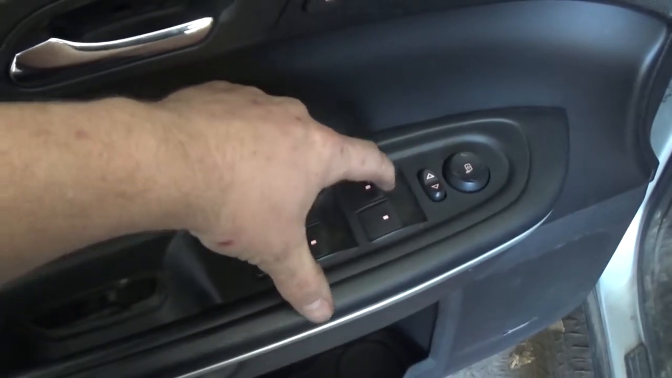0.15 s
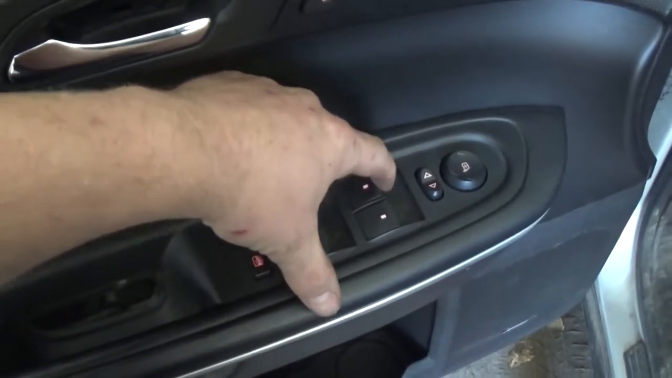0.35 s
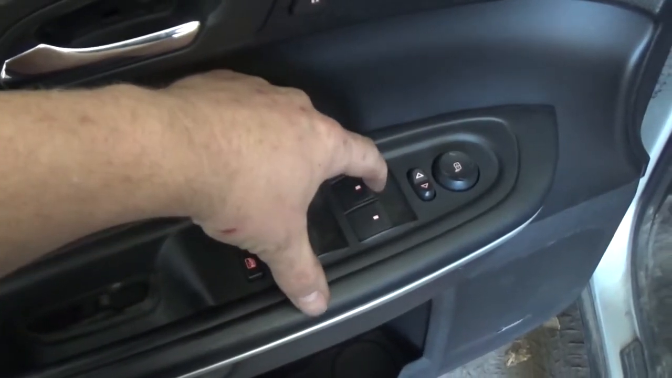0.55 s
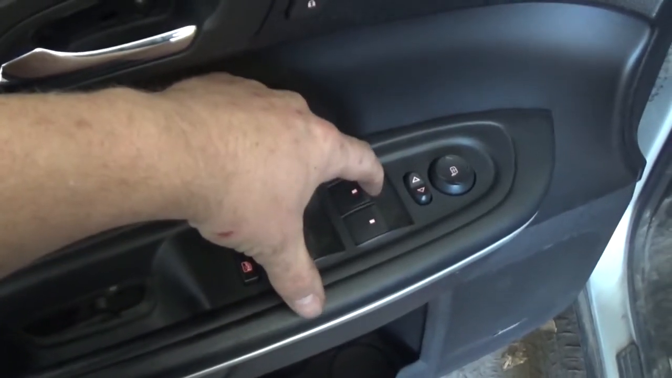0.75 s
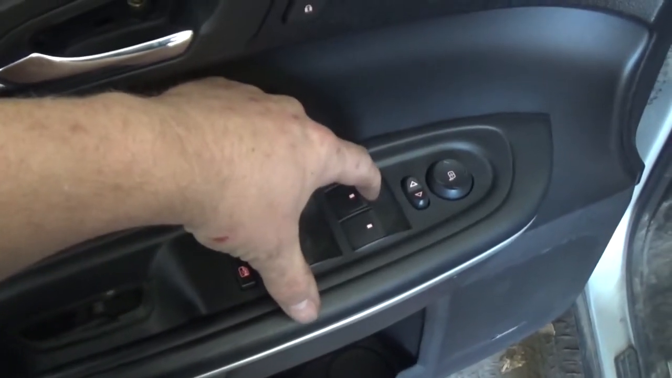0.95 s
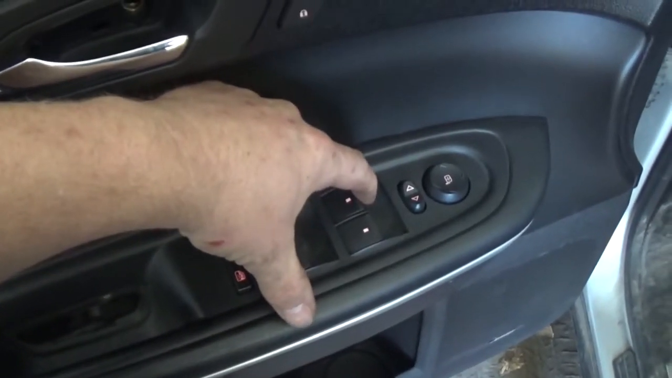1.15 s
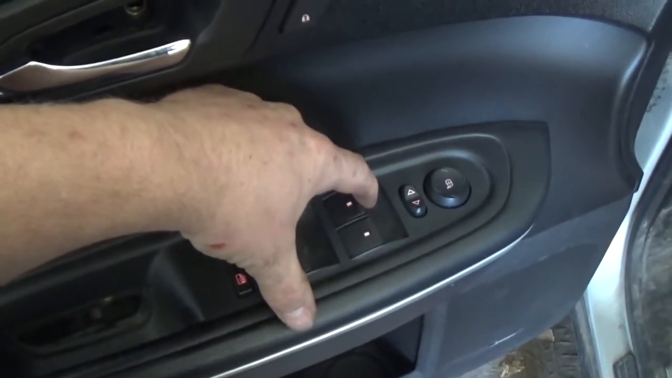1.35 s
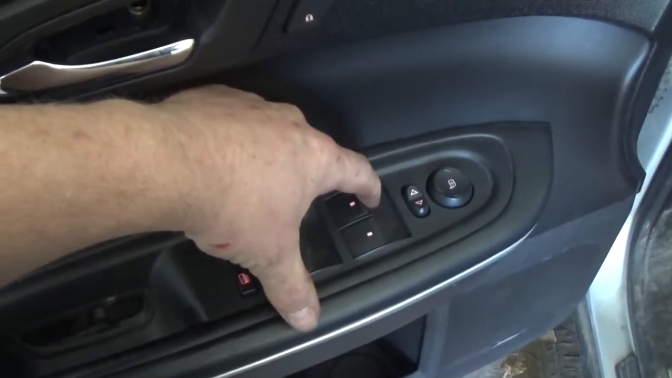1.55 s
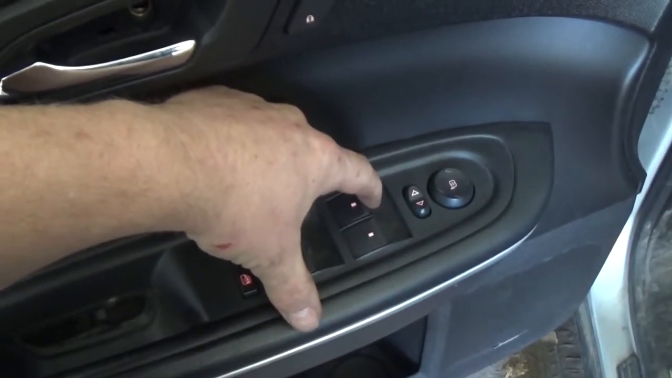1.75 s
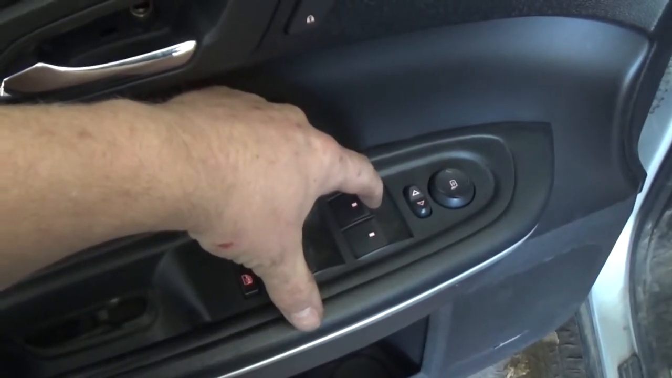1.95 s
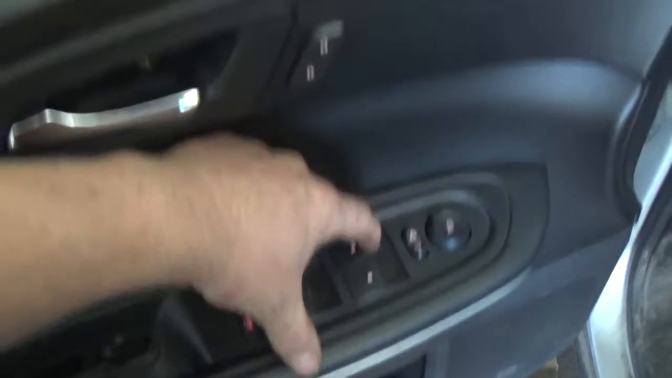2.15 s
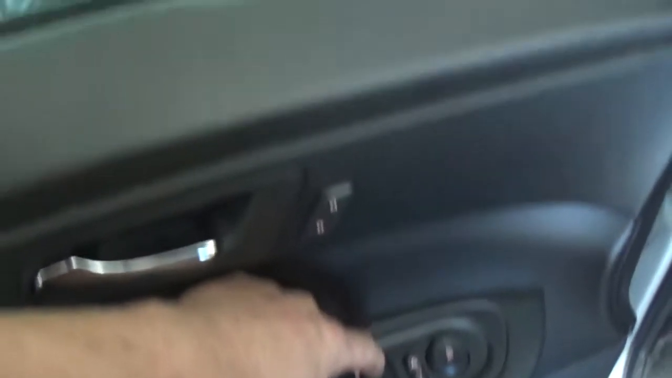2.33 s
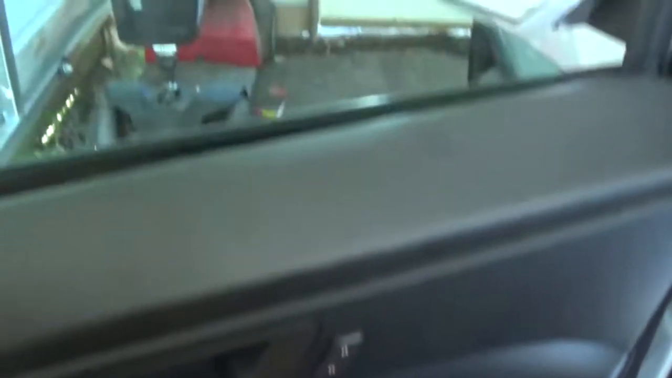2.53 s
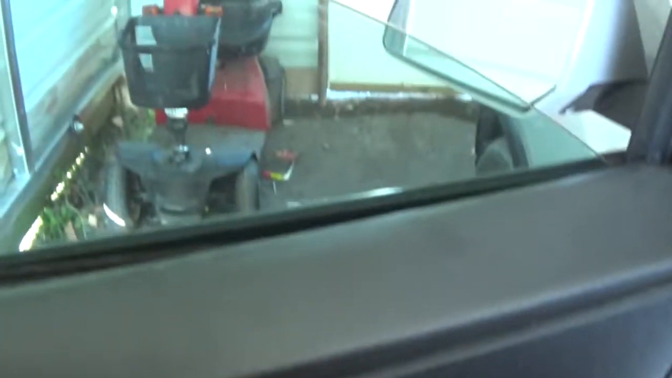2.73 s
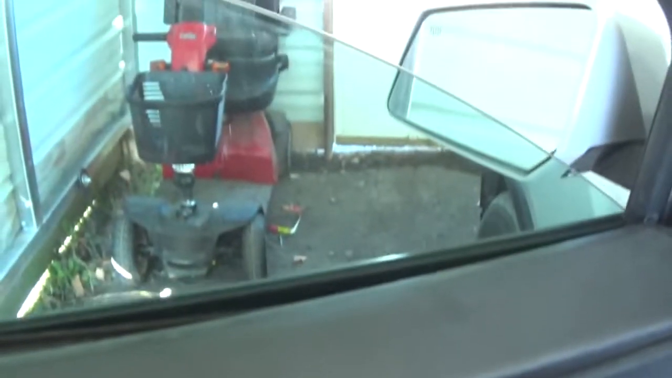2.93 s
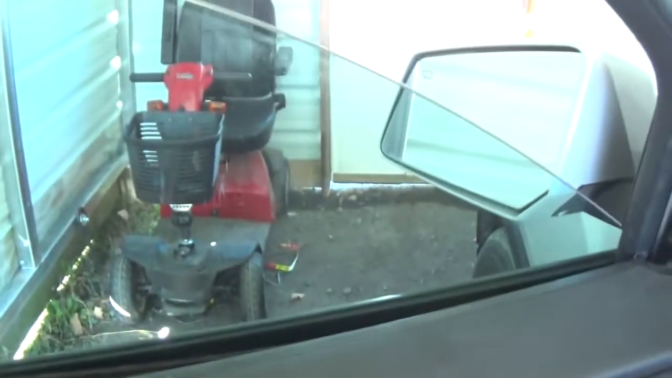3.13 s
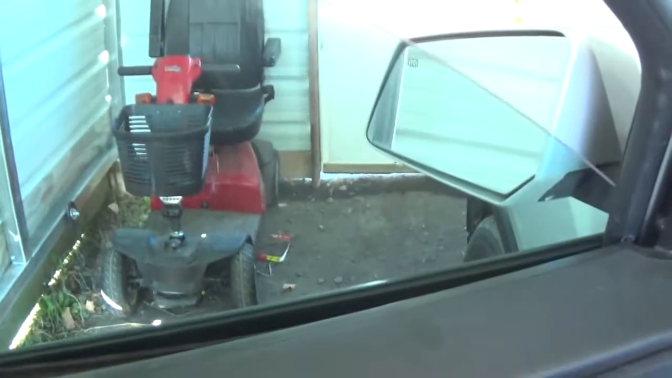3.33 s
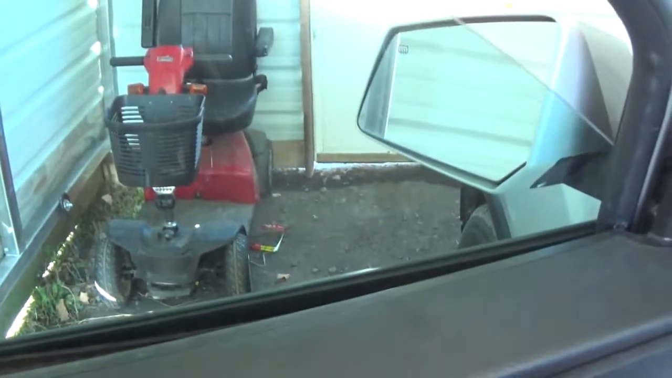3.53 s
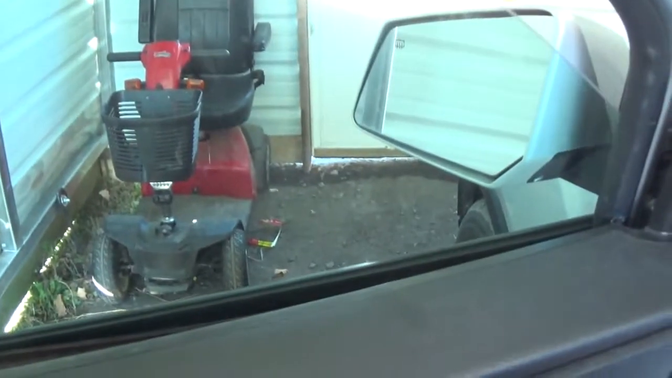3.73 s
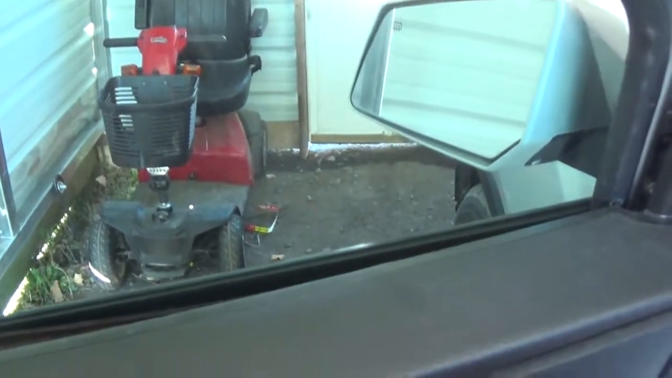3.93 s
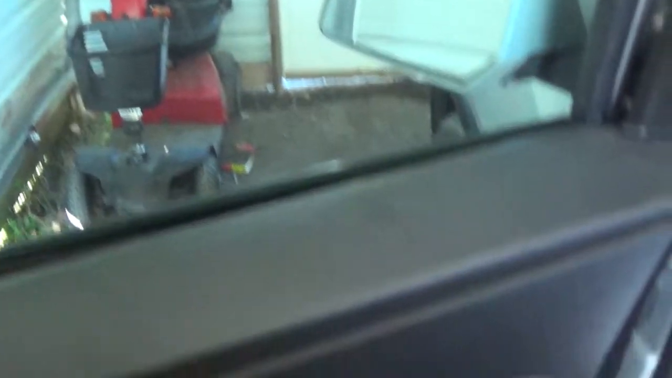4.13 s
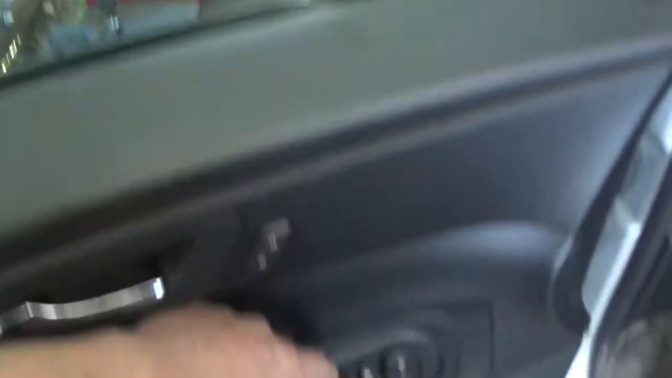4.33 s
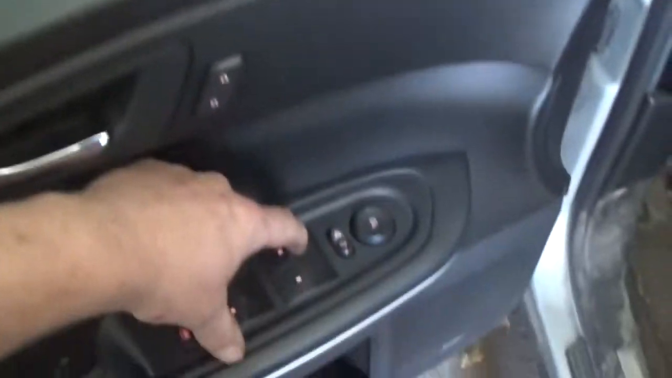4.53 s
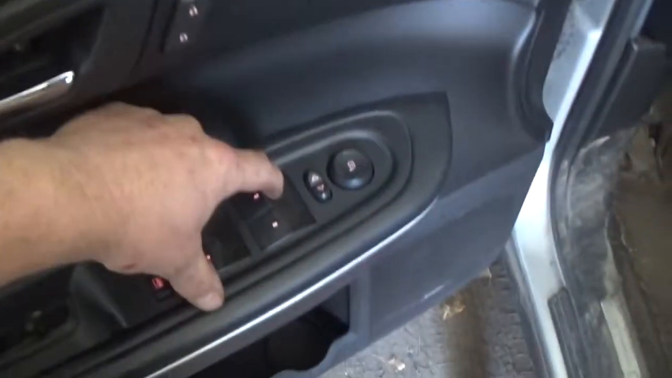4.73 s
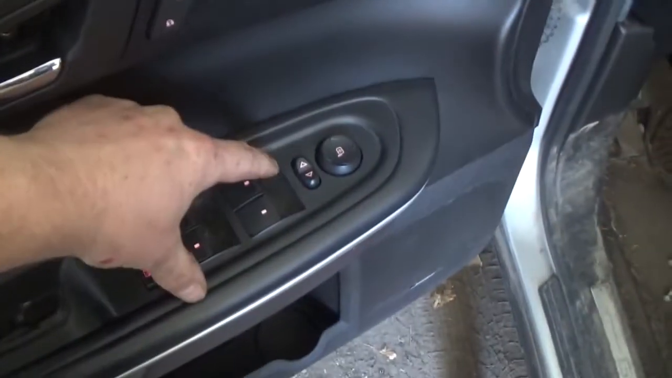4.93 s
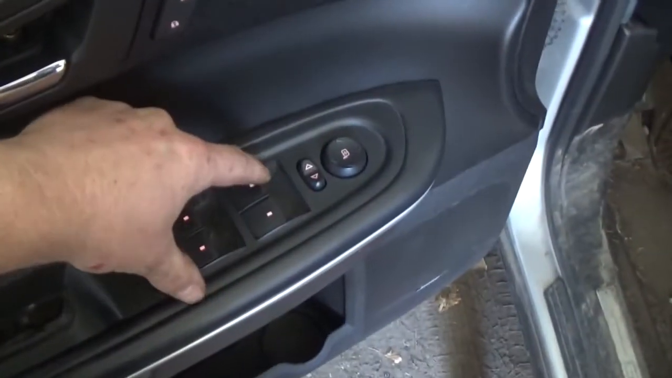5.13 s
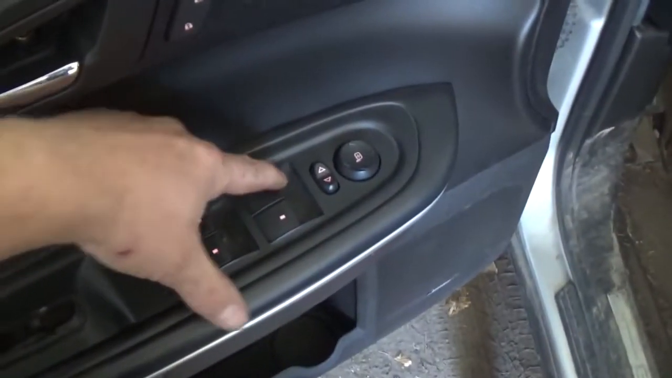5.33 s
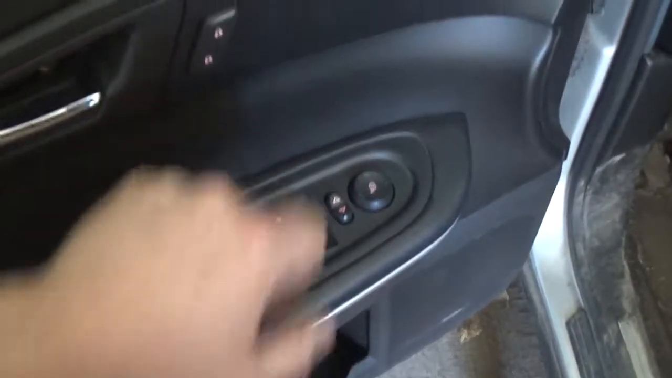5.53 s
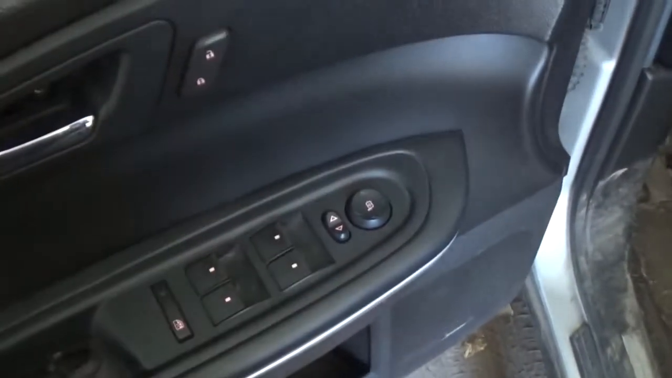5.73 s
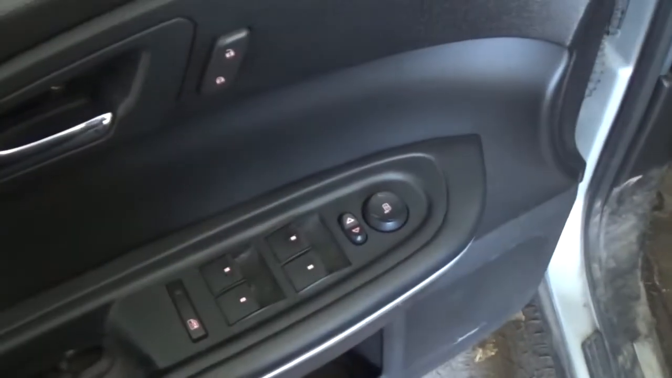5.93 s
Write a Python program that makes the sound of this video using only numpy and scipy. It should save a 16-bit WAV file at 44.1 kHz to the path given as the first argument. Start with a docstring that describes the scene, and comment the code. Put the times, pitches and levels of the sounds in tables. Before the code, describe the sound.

A close stereo microphone pair catches a power window inside a car door. Light ticks and hollow rattling knocks start a buzzing motor whine, with growing brush hiss and glass sliding along seals. Brief rubber squeaks come before the pane hits the top with a soft thump and the motor stops. The switch clicks back, fidgety ticks follow, then a sharp click, knocks and a brighter descending-window whir.

```python
"""A switch clicks over quiet surroundings, knocks sound in a car door and its power window motor whines up.
Shaft-order tones form the whine; filtered noise makes brush hiss, rail rumble, seal rub and felt hiss.
Damped sines and noise bursts make the clicks and knocks as the drive takes up slack and the glass thuds home.
The rubber squeaks, the motor stalls, the switch snaps back and is pressed again.
The lightly loaded motor then spins faster to lower the glass, all heard from close to the door panel."""
import sys
import numpy as np
from scipy import signal
from scipy.fft import rfft, irfft, next_fast_len
from scipy.io import wavfile
from scipy.ndimage import uniform_filter1d

SR = 44100
rng = np.random.default_rng(int(sys.argv[2]) if len(sys.argv) > 2 else 0)


def store_pcm(level_fs):
    """Save levels as 16-bit WAV."""
    pcm = np.round(np.clip(level_fs, -1, 1) * 32767).astype(np.int16)
    wavfile.write(sys.argv[1], SR, np.atleast_2d(pcm).T)


N = 267995
T = np.arange(N) / SR

START_S, SEAL_S, STALL_S = 0.25, 4.47, 4.565  # motor on, glass meets top seal, motor stalls
RISE_S, RELEASE_T60_S = 0.0074, 0.17  # envelope of rubbing sounds


def amp(db):
    """Decibels to gain."""
    return 10 ** (np.asarray(db) / 20)


def unit(x):
    """Scales to an rms of one."""
    return x / np.sqrt(np.mean(x ** 2) + 1e-20)


def struck(x):
    """Scales a blow so that its first 10 ms have an rms of one."""
    return x / np.sqrt(np.mean(x[:SR // 100] ** 2) + 1e-20)


def curves(rows):
    """Interpolates each column of (t/s, ..) rows at every sample."""
    times_s, *columns = np.transpose(rows)
    return [np.interp(T, times_s, column) for column in columns]


def during(rows):
    """One within the time a table spans, zero outside, with soft edges."""
    inside = (T > rows[0][0]) & (T < rows[-1][0])
    return uniform_filter1d(1. * inside, size=400)


def held(start_s, end_s):
    """Quick rise, hold and exponential release."""
    return np.clip((T - start_s) / RISE_S, 0, 1) * dying(np.maximum(T - end_s, 0), RELEASE_T60_S)


def dying(t, t60_s):
    """Exponential decay by 60 dB in t60."""
    return np.exp(-np.log(1000) * t / t60_s)


def colour(x, spectrum):
    """Filters by (f/Hz, gain/dB) rows, interpolated over log frequency."""
    hz, db = np.transpose(spectrum)
    size = next_fast_len(len(x))
    f = np.fft.rfftfreq(size, 1 / SR)
    gain = amp(np.interp(np.log(f + 1), np.log(hz), db))
    return irfft(rfft(x, size) * gain, size)[:len(x)]


def wander(rate_hz):
    """Smooth random curve of rms one with rate_hz knots a second."""
    knots = rng.standard_normal(8192)
    return unit(np.interp(T * rate_hz, np.arange(len(knots)), knots))


def add(mix, start_s, sound):
    """Mixes a sound in at its start time."""
    part = mix[round(start_s * SR):][:len(sound)]
    part += sound[:len(part)]


def ring(modes, t):
    """Damped sines of alternating sign from (f/Hz, level/dB, t60/s) rows."""
    return sum((-1) ** k * amp(db - 60 * t / t60_s) * np.sin(2 * np.pi * hz * t)
               for k, (hz, db, t60_s) in enumerate(modes))


def shaft(turns_per_s, jitter):
    """Shaft angle in radians; uneven friction makes the speed tremble."""
    return 2 * np.pi * np.cumsum(turns_per_s * (1 + jitter * wander(70))) / SR


def tone(angle, order, flutter_db):
    """One multiple of the shaft rate, fluttering in strength."""
    phase = 2 * np.pi * rng.random()
    return np.sqrt(2) * np.cos(order * angle + phase) * amp(flutter_db * wander(45))


# quiet surroundings, noise spectrum: f/Hz, relative density/dB
AMBIENCE_SPECTRUM = [(25, -19), (80, -5), (160, -8.5), (400, 1.5), (520, 0), (680, -3), (840, 2),
                     (1200, -8), (2000, -11), (2400, -13), (3100, -5), (3500, -11), (4200, -3.5),
                     (5000, -16.5), (8700, -11.5), (11000, -17), (15700, -16)]
AMBIENCE_DB = -71.5


def ambience():
    """Steady coloured noise of the surroundings."""
    return amp(AMBIENCE_DB) * unit(colour(rng.standard_normal(N), AMBIENCE_SPECTRUM))


# faint background tones: f/Hz, level/dB
BACKGROUND_TONES = [(1997, -87), (3009, -83), (3112, -90), (3960, -88)]


def still_tones():
    """Thin continuous tones of fixed pitch, fluttering in strength."""
    return sum(amp(db) * tone(2 * np.pi * hz * T, order=1, flutter_db=1.2) for hz, db in BACKGROUND_TONES)


# faint whistles before motor start and after stall: start t/s, end t/s, first f/Hz, last f/Hz, level/dB
WHISTLE_GLIDES = [(0.135, .22, 3400, 3650, -77), (4.6, 4.76, 1900, 1850, -72),
                  (4.59, 4.74, 1230, 1210, -74), (4.59, 4.72, 1020, 1000, -73)]


def whistles():
    """Thin gliding tones, unsteady in pitch and strength."""
    out = np.zeros(N)
    for start_s, end_s, first_hz, last_hz, db in WHISTLE_GLIDES:
        glide = [(start_s, first_hz), (end_s, last_hz)]
        angle = shaft(curves(glide)[0], jitter=0.008)
        out += amp(db) * tone(angle, order=1, flutter_db=2.5) * during(glide)
    return out


# switch clicks and plastic ticks before the final damping:
# t/s, level/dB, main ring f/Hz, t60/s, broad snap level/dB, snap centre f/Hz
SWITCH_CLICKS = [(.106, -59, 6840, 0.016, 9, 7000), (0.164, -45.5, 7500, 0.0026, -8, 3980),
                 (0.207, -39.5, 4240, 0.017, 3, 8000), (4.016, -46, 4700, .009, 24, 6000),
                 (4.049, -42.5, 4450, 0.04, 18, 3470), (4.734, -53.5, 1820, .021, -5, 4000),
                 (4.765, -51, 2670, 0.024, 2, 2780), (4.7885, -54, 3080, 0.012, 13, 3000),
                 (4.793, -30, 4330, 0.016, -4.5, 7800), (5.116, -52, 2620, 0.019, 4, 2200),
                 (5.267, -53.5, 2590, 0.023, 4, 2200), (5.290, -53, 1570, .05, 7, 3000),
                 (5.314, -42, 1540, 0.027, 1, 4500), (5.33, -39.5, 4600, 0.023, 8, 8400),
                 (5.400, -45.5, 4380, 0.0048, 14, 7000), (5.419, -42, 8060, .01, 0, 8000),
                 (5.4341, -32, 3110, 0.045, 7, 6600)]


def clicks():
    """Each click is a broad snap, one short ring of the plastic and a faint answer from the armrest."""
    out, t = np.zeros(N), np.arange(SR // 6) / SR
    armrest_spectrum = [(100, -14), (300, -3), (650, -2.5), (1100, -5.5), (2500, -15), (8000, -48)]
    for start_s, db, ring_hz, t60_s, snap_db, snap_hz in SWITCH_CLICKS:
        burst, body = rng.standard_normal((2, len(t)))
        snap_spectrum = [(snap_hz / 16, -14), (snap_hz / 4, -4), (snap_hz, 0),
                         (snap_hz * 2, -7), (snap_hz * 3, -26)]
        snap_decay = dying(t, t60_s) + 0.1 * dying(t, 0.12)
        snap = struck(colour(burst, snap_spectrum) * snap_decay)
        plastic = struck(ring([(ring_hz, 0, t60_s), (ring_hz * 0.937, -7, t60_s)], t))
        armrest = struck(colour(body, armrest_spectrum) * dying(t, 0.11))
        onset = 1 - np.exp(-t / 0.0004)
        click = struck((plastic + amp(snap_db) * snap + amp(-10) * armrest) * onset)
        add(out, start_s, amp(db) * click)
    # soft plastic damps the top octave
    return colour(out, [(9000, -4.0), (11000, -1.5), (13500, -14), (15700, -30)])


# door modes: f/Hz, level/dB, t60/s
DOOR_MODES = [(218, -2, 0.24), (289, 3, 0.12), (323, 2, 0.17), (527, 12, 0.017), (640, -1, 0.12),
              (696, 2.5, 0.035), (838, 3.5, 0.089), (1000, -26, 0.17), (1300, -43, 0.12), (1470, -19, 0.03),
              (1770, -8, 0.062), (1747, -5, 0.12), (1950, -41, 0.065), (2170, -37, 0.08), (2490, -9, 0.05),
              (2756, 3, 0.035), (3100, -43, 0.07), (3560, -30, 0.092)]
# low modes of whole panel and pane: f/Hz, level/dB, t60/s
PANEL_MODES = [(62, -54, .25), (93, -8.5, 0.63), (136, 6, 0.051), (186, 3, 0.51), (230, 7, 0.087),
               (246, 12.5, 0.053)]
# loose parts, noise spectrum: f/Hz, relative density/dB
RATTLE_SPECTRUM = [(60, -81), (200, -14), (450, 6), (900, 2), (1300, 4.5), (2000, 9), (3000, -10.5),
                   (4500, -4), (9000, -22), (15000, -40)]
# blows inside the door: t/s, level/dB, hardness corner f/Hz, struck spot f/Hz, spot level/dB,
# panel boom level/dB, rattle level/dB, contact damping t60/s
DOOR_KNOCKS = [(.218, -43.5, 600, 369, -4, -27, 4, 0.17), (.229, -55, 600, 550, -6, -21, -15, .1),
               (0.2515, -41, 3500, 1580, -16, -28, -13, 0.084), (.253, -28, 2610, 712, -8, -24, -6, 0.021),
               (.2558, -27, 1790, 315, -3, -37, -2, 0.056), (.262, -38, 2500, 1700, -20, -30, 6, 0.045),
               (0.2672, -35, 3500, 2250, -24, -32, -12, 0.27),
               (0.2687, -38.5, 900, 502, 5, -28, -10, 0.081), (.2825, -40, 600, 363, -4, -30, -2, 0.08),
               (0.2998, -42.5, 600, 343, 7, -28, -1, 0.12), (.3075, -46, 1200, 730, 3, -26, 2, 0.045),
               (0.3388, -43, 500, 402, -12, -16, -1, .06), (0.3514, -44, 700, 290, -2, -9, -3, 0.052),
               (.368, -64, 300, 88, 8, -10, -10, .12), (3.997, -47, 900, 540, 3, -30, -15, .03),
               (4.0153, -40.5, 1200, 560, 2, -28, -22, 0.022), (4.0495, -44.5, 900, 477, 2, -24, -8, 0.025),
               (4.543, -38.5, 1300, 209, -10, 1.5, 4, 0.19), (4.552, -42, 1000, 233, -1, -1, 1, 0.13),
               (4.563, -41.5, 1400, 474, -6, -7, 12, 0.13), (4.585, -48.5, 700, 310, -5, -1, -1, 0.25),
               (4.622, -52, 800, 522, -11, -10, 7, .2), (4.598, -53, 400, 160, -5, -7, 9, .16),
               (4.799, -49.5, 1000, 910, 2, -21, -1, 0.059), (5.342, -46, 900, 447, -6, 0.5, -10, 0.068),
               (5.3663, -45, 3000, 1900, -5, -30, 3, 0.15), (5.37, -40, 2500, 312, -14, -32, 9, 0.19),
               (5.4761, -45, 2000, 1400, -11, -21, -1, 0.099), (5.479, -33.5, 1800, 743, -2, -26, 7, 0.047),
               (5.482, -40.5, 900, 317, 13, -16, -8, .1), (5.4936, -39, 1600, 330, 3, -16, 3, 0.045),
               (5.505, -52, 500, 258, 8, -6, -6, 0.23)]


def knocks():
    """Blows ring door modes, the struck spot, loose parts and panel; a low corner dulls soft blows."""
    out, t = np.zeros(N), np.arange(SR // 2) / SR
    bass_cut = signal.butter(2, 150, "high", fs=SR)  # small parts radiate almost no bass
    door = struck(signal.lfilter(*bass_cut, ring(DOOR_MODES, t)))
    panel = struck(ring(PANEL_MODES, t))
    rattle_decay = dying(t, 0.055) + 0.06 * dying(t, 0.3)
    for start_s, db, corner_hz, spot_hz, spot_db, boom_db, rattle_db, t60_s in DOOR_KNOCKS:
        loose = struck(colour(rng.standard_normal(len(t)), RATTLE_SPECTRUM) * rattle_decay)
        rattle = signal.lfilter(*bass_cut, loose)
        blow = signal.lfilter(*signal.butter(1, corner_hz, fs=SR), door + amp(rattle_db) * rattle)
        spot_band = signal.lfilter(*signal.iirpeak(spot_hz, 2, fs=SR), blow)
        damping = dying(t, t60_s)  # a part pressed against the door stops its ringing
        blow = struck(damping * (blow + 1.63 * spot_band))
        onset = 1 - np.exp(-t * spot_hz)  # time constant of one cycle
        spot = struck(damping * np.sin(2 * np.pi * spot_hz * t) * onset)
        boom = amp(boom_db) * panel * damping
        add(out, start_s, amp(db) * (struck(blow + amp(spot_db) * spot) + boom))
    return out


# rubber squeaks: start t/s, end t/s, first f/Hz, last f/Hz, level/dB before the swell envelope
SQUEAK_GLIDES = [(1.586, 1.665, 1700, 1780, -55.5), (2.663, 2.763, 1420, 1370, -59),
                 (4.287, 4.338, 1750, 1880, -48), (4.32, 4.36, 2950, 2940, -50),
                 (5.51, 5.536, 4500, 2660, -49), (5.517, 5.562, 2400, 1640, -47.5)]
SQUEAK_WIDTH_HZ = 190


def squeaks():
    """Rubber slips on the glass and rings one coarse resonance, which glides as the lip bends."""
    out = np.zeros(N)
    lowpass = signal.butter(2, SQUEAK_WIDTH_HZ / 2, fs=SR)
    for start_s, end_s, first_hz, last_hz, db in SQUEAK_GLIDES:
        u = np.linspace(0, 1, round((end_s - start_s) * SR))
        a, b = signal.lfilter(*lowpass, rng.standard_normal((2, SR))[:, :len(u)])
        angle = 2 * np.pi * np.cumsum(first_hz * (last_hz / first_hz) ** u) / SR
        resonance = unit(a * np.cos(angle) + b * np.sin(angle))
        add(out, start_s, amp(db) * resonance * 2 * np.sqrt(u * (1 - u)))
    return out


def friction(spectrum, grain_db, flicker_db):
    """Countless tiny slips of uneven size, as noise with fast grain and slower flicker."""
    slips = rng.standard_normal(N) * amp(grain_db * wander(1200))
    return unit(colour(slips, spectrum) * amp(flicker_db * wander(60)))


def cavity(x):
    """Dense early echoes within the door comb the sound with faint, fixed peaks."""
    t = np.arange(SR // 10) / SR
    echoes = rng.standard_normal(len(t)) * dying(t, 0.1)
    return unit(x + 0.28 * signal.oaconvolve(x, echoes / np.linalg.norm(echoes))[:N])


# carriage in its rail, noise spectrum: f/Hz, relative density/dB
RUMBLE_SPECTRUM = [(25, -38), (45, -39), (60, -9.5), (110, -13), (170, -3.5), (200, -3), (228, 1.5),
                   (256, -5), (290, 6.5), (335, 5), (450, 3.5), (700, 1), (1400, -36)]
# glass on rubber seals, noise spectrum: f/Hz, relative density/dB
RUB_SPECTRUM = [(250, -19.5), (500, -36), (750, 0.5), (1050, 3), (1450, 0.5), (1850, 1.5), (2300, 0),
                (2800, 0.5), (3400, -3.5), (4600, -9), (7000, -14), (12000, -66)]
# glass in felt channel, noise spectrum: f/Hz, relative density/dB
HISS_SPECTRUM = [(2500, -19.5), (4500, -3.5), (5800, -3.5), (7000, -1.5), (8700, 2), (9900, -2),
                 (11000, -9.5), (12500, -12.5), (14000, -18.5), (15700, -30)]


def sliding(levels):
    """The carriage rumbles in its rail while the glass rubs the rubber seals and hisses along the felt."""
    rumble = friction(RUMBLE_SPECTRUM, grain_db=0.8, flicker_db=1.2)
    rub = cavity(friction(RUB_SPECTRUM, grain_db=0.0, flicker_db=0.43))
    hiss = cavity(friction(HISS_SPECTRUM, grain_db=0.5, flicker_db=0.5))
    return (levels * [rumble, rub, hiss]).sum(0)


# rising glass: share of travel/1, rumble level/dB, rub level/dB, hiss level/dB
RISING_GRIP = [(0, -61.5, -61, -74.5), (.43, -59.5, -55.5, -60.5), (.53, -64.5, -52.5, -54.5),
               (.74, -62.5, -50.5, -49.5), (1, -60, -53.5, -53)]
# passing scrapes of carriage, seals and hand: t/s, hold/s, rumble level/dB, rub level/dB, hiss level/dB
PASSING_SCRAPES = [(0.205, 0.16, -51, -58, -87), (1.578, 0.057, -77, -55, -66),
                   (2.651, 0.025, -77.5, -51, -53), (2.947, 0.13, -75, -53, -75),
                   (4.283, 0.049, -61, -44.5, -46), (4.333, 0.029, -54, -47.5, -52),
                   (4.455, 0.062, -54, -45.5, -49.5), (4.536, 0.034, -41, -49, -66),
                   (4.594, 0.15, -61, -61.5, -65), (4.752, 0.68, -76, -73, -73.5),
                   (5.02, .03, -79, -75, -77), (5.125, 0.041, -70, -73, -72), (5.22, 0.063, -82, -71, -72),
                   (5.282, 0.052, -58, -57.5, -56.5), (5.348, 0.055, -47, -53, -61),
                   (5.412, 0.02, -56, -47, -49), (5.432, 0.033, -52, -47.5, -45),
                   (5.501, 0.033, -57, -45.5, -47)]
DESCENT_S, DESCENT_DB = 5.45, (-57, -52.5, -53)  # sinking glass: rumble, rub, hiss


def friction_levels():
    """Gains of rumble, rub and hiss: grip follows glass height; sinking and scrapes add their power."""
    travel = np.cumsum(lift_speed() * (T < STALL_S))
    heights, *grip_db = np.transpose(RISING_GRIP)
    rising_db = [np.interp(travel / travel[-1], heights, db) for db in grip_db]
    rising = amp(rising_db) * held(START_S, STALL_S)
    sinking = np.outer(amp(DESCENT_DB), held(DESCENT_S, T[-1]))
    scrape_power = sum(np.outer(amp(db), held(start_s, start_s + hold_s)) ** 2
                       for start_s, hold_s, *db in PASSING_SCRAPES)
    return np.sqrt(rising ** 2 + sinking ** 2 + scrape_power)


# lifting motor before spin-up, jerks and sag: t/s, shaft speed/(turns/s)
LIFT_RUNNING_SPEED = [(0.34, 53.9), (0.42, 53.0), (0.5, 52.2), (0.64, 52.2), (0.85, 53.6), (1.1, 54.4),
                      (1.3, 53.9), (1.75, 53.9), (1.99, 54.5), (2.35, 55.6), (2.71, 55.5), (2.85, 56.1),
                      (3.27, 56.6), (3.62, 58.4), (3.72, 59.5), (3.79, 59.3), (3.87, 60.2), (4.02, 58.9),
                      (4.09, 59.5), (4.24, 59.8), (4.38, 57.9), (4.47, 57.4)]
# tight spots of the big gear: t/s
CATCH_TIMES = [.695, 2.045, 3.335]
CATCH_TURNS_PER_S, CATCH_HZ, CATCH_DECAY_S = 2.1, 7.9, 0.035
SPIN_UP_S = 0.02
SAG_TURNS_PER_S, SAG_S = 6.3, 0.04  # braking by the top seal


def lift_speed():
    """Turns per second: spin-up, running speed, hold-back and spring at tight spots, sag into the seal."""
    jerks = sum(np.sin(2 * np.pi * CATCH_HZ * (T - s)) * np.exp(-abs(T - s) / CATCH_DECAY_S)
                for s in CATCH_TIMES)
    sag = SAG_TURNS_PER_S * (1 - np.exp(-(np.maximum(T - SEAL_S, 0) / SAG_S) ** 2))
    running = curves(LIFT_RUNNING_SPEED)[0] + CATCH_TURNS_PER_S * jerks - sag
    return running * (1 - np.exp(-np.maximum(T - START_S, 0) / SPIN_UP_S))


# brush hiss, noise spectrum: f/Hz, relative density/dB
BRUSH_SPECTRUM = [(1500, -44), (3000, -12.5), (4500, -12.5), (6900, 0.5), (7700, 0), (8700, 1.5), (9400, 1),
                  (10200, -7.5), (15000, -28)]
BRUSH_DB, BRUSH_START_DB, BRUSH_GROWN_S = -61, -9.5, 1.4  # full level, start offset, time when full
BRUSH_WEAR_DB, BRUSH_REPEAT_SHARE = 2.5, 0.35  # coarse-wear modulation, power share of the repeating grain


def brushes():
    """Brushes scrape the same worn commutator every turn, so their hiss has a repeating grain."""
    turns = shaft(lift_speed(), jitter=0.0012) / (2 * np.pi)
    fine, coarse = (unit(np.interp(turns, np.arange(size) / size, rng.standard_normal(size), period=1))
                    for size in (700, 80))  # points per turn
    fresh = rng.standard_normal(N)
    grain = np.sqrt(BRUSH_REPEAT_SHARE) * fine + np.sqrt(1 - BRUSH_REPEAT_SHARE) * fresh
    scrape = grain * amp(BRUSH_WEAR_DB * coarse)
    growth_db = np.interp(T, [START_S, BRUSH_GROWN_S], [BRUSH_START_DB, 0])
    return amp(BRUSH_DB + growth_db) * unit(colour(scrape, BRUSH_SPECTRUM)) * held(START_S, STALL_S)


def wash(levels):
    """Sliding glass and motor brushes over the quiet surroundings."""
    return sliding(levels) + brushes() + ambience()


# lowering motor: t/s, whine gain/dB, gear tone level/dB
LOWER_LEVELS = [(5.48, -79, -85), (5.525, -61, -68), (5.56, -51, -61), (5.61, -47.5, -57.5),
                (5.68, -47, -56.5), (5.8, -47, -57), (5.92, -45.5, -61), (6.09, -45.5, -63)]
# lowering motor: t/s, shaft speed/(turns/s)
LOWER_SHAFT_SPEED = [(5.48, 70), (5.53, 86), (5.6, 87.8), (5.66, 86.6), (5.8, 86.8), (5.92, 87),
                     (6.09, 87.8)]
# lowering whine: shaft order/1, level relative to whine gain/dB
LOWER_ORDERS = [(3, -16.5), (4, -21), (5, -13.5), (7, -19), (8, -24), (10, -3), (11, -28), (13, -17.5),
                (14, -28), (16, -19), (20, -33), (32, -23)]
GEAR_ORDER = 22


def lowering():
    """With the weight of the glass helping, the motor spins up to a higher whine of shaft orders."""
    whine_db, gear_db = curves(LOWER_LEVELS)
    angle = shaft(curves(LOWER_SHAFT_SPEED)[0], jitter=0.0023)
    whine = amp(whine_db) * sum(amp(db) * tone(angle, round(order), flutter_db=0.5)
                                for order, db in LOWER_ORDERS)
    gear = amp(gear_db) * tone(angle, GEAR_ORDER, flutter_db=0.5)
    return (whine + gear) * during(LOWER_LEVELS)


# motor housing resonances: f/Hz, half width/Hz, lift/dB
HOUSING_MODES = [(880, 13, 7), (965, 13, 7)]


def housing(hz):
    """Lift in dB that the motor housing resonances give to a tone."""
    return sum(db / (1 + ((hz - centre_hz) / width_hz) ** 2) for centre_hz, width_hz, db in HOUSING_MODES)


# armature slot whine: t/s, level/dB
SLOT_WHINE = [(0.34, -50), (0.78, -48.3), (0.92, -44.5), (1.87, -41.3), (2.45, -46.8), (2.93, -48.8),
              (3.08, -45.8), (3.35, -46), (3.65, -47.7), (3.85, -56), (4.02, -52), (4.14, -53),
              (4.22, -51.5), (4.29, -55.5), (4.4, -50.5), (4.56, -52)]
# swelling tones: shaft order/1
SWELLING_ORDERS = (7, 8, 13, 16, 18, 19, 20, 21, 22, 28, 30, 60, 62)
# one row of swells per order above: middle t/s, half length/s, level before strain and waver/dB
ORDER_SWELLS = [
    [(.65, .22, -63), (3.87, .22, -57)],
    [(4.13, .13, -60)],
    [(1.5, .55, -66), (2.1, .13, -62), (2.95, .4, -61), (3.65, .2, -63), (4.43, .09, -60)],
    [(1.15, .25, -62.5), (1.8, .35, -64.5), (2.88, .27, -56), (3.38, .25, -60), (4.16, .17, -56)],
    [(1.6, .7, -70), (2.65, .22, -61), (3.07, .13, -62), (4.13, .15, -63)],
    [(.8, .12, -67), (2.02, .17, -59.5), (2.6, .43, -53.3), (3.4, .35, -60), (4.23, .1, -55.5),
     (4.4, .1, -59.5)],
    [(.52, .12, -61), (.76, .09, -59.5), (1.2, .19, -58), (1.52, .17, -55), (1.8, .16, -50),
     (2.15, .22, -47.7), (2.4, .06, -58), (2.77, .17, -56), (3.25, .34, -50.8), (3.6, .07, -53),
     (3.79, .1, -49), (4.12, .08, -56.5), (4.25, .07, -54), (4.39, .09, -50.5), (4.53, .05, -54)],
    [(1.7, .4, -71), (2.47, .22, -65), (3.7, .42, -61), (4.42, .12, -63)],
    [(3.4, .2, -62), (4.4, .15, -63)],
    [(2.583, 0.19, -59)],
    [(.5, .13, -71), (.82, 0.1, -65), (1.52, 0.38, -62), (2.5, 0.25, -65.5), (3.3, .42, -62.5),
     (4.42, .13, -63)],
    [(.9, 0.4, -74), (2.26, 0.15, -63), (2.5, 0.12, -68)],
    [(1.55, .35, -69.5)],
]
# weaker buzz: shaft order/1, level before growth, drift and housing/dB
LIFT_ORDERS = [(4, -71), (5, -73), (6, -69), (7, -68), (9, -71), (11, -71), (12, -69), (15, -72), (17, -70),
               (24, -75), (31, -74), (33, -72), (36, -76), (40, -73)]
SLOTS = 10
SWELL_WAVER_DB, STRAIN_DB = 0.4, 4  # shared waver, growth under the seal's load
LOADED_S, FADE_IN_S, STOP_S = 0.32, 0.026, 0.018  # slack gone, whine fade-in, fade-out at stall


def lifting():
    """Ten armature slots whine; small differences between them buzz at other shaft orders."""
    speed = lift_speed()
    angle = shaft(speed, jitter=0.0012)
    whine = amp(curves(SLOT_WHINE)[0]) * tone(angle, SLOTS, flutter_db=0.5)
    strain_db = np.interp(T, [SEAL_S, STALL_S], [0, STRAIN_DB])
    waver_db = SWELL_WAVER_DB * wander(20)
    # phase-locked: 19 and 21 beat in step with 20, so the octave throbs once a turn
    for order, swells in zip(SWELLING_ORDERS, ORDER_SWELLS):
        power = sum(amp(db) ** 2 * np.exp(-((T - mid_s) / half_s) ** 4) for mid_s, half_s, db in swells)
        whine += np.sqrt(2 * power) * amp(strain_db + waver_db) * np.cos(order * angle)
    growth_db = np.interp(T, [0.5, 1.4, 2.8, 4.4], [-11.0, -2.5, 0.0, 0.5])  # grows as the glass rises
    for order, db in LIFT_ORDERS:
        drift_db = 2.3 * wander(4)
        level_db = db + growth_db + drift_db + housing(order * speed)
        whine += amp(level_db) * tone(angle, round(order), flutter_db=2.0)
    fade_in = np.clip((T - LOADED_S) / FADE_IN_S, 0, 1)
    fade_out = np.clip(1 - (T - STALL_S) / STOP_S, 0, 1)
    return whine * fade_in * fade_out


# spread sound: f/Hz, side gain/dB
SPREAD_WIDTH = [(60, -23), (125, -51), (250, -36), (500, -14.5), (1000, -10), (2000, -10), (4000, -6.5),
                (8000, -9.5), (10500, -14), (12500, -69)]
# motor tones: f/Hz, side gain/dB
MOTOR_SIDE = [(200, -36), (520, -25), (555, -18), (595, -14), (700, -31), (870, -50), (1050, -10),
              (1150, -20), (1600, -16), (3400, -16)]
# direct sound: f/Hz, left minus right level/dB
LEFT_LEAN = [(125, 0.4), (500, 0.28), (1000, 1.1), (2000, 2.6), (4000, 2.7), (8000, .2)]


def microphones(direct, spread, motor):
    """Two close capsules: spread sound differs between them, bass stays near mono, the door leans left."""
    late_motor = (signal.hilbert(motor) * np.exp(-1j * np.pi / 3)).real  # part level, part phase difference
    side = colour(spread, SPREAD_WIDTH) + colour(late_motor, MOTOR_SIDE)
    left = colour(direct, [(hz, db / 2) for hz, db in LEFT_LEAN])
    right = colour(direct, [(hz, -db / 2) for hz, db in LEFT_LEAN])
    return motor + np.array([left + side, right - side])


def scene():
    """Motor, glass, switch and door at the microphone pair."""
    motor = lifting() + lowering() + whistles()
    hits = clicks() + knocks() + squeaks()
    levels = friction_levels()
    skew = signal.hilbert(hits).imag  # hits reach the two capsules slightly out of phase
    direct = wash(levels) + hits
    spread = wash(levels) + 0.55 * skew
    return microphones(direct, spread, motor) + still_tones()


def record(dry):
    """The recorder's bass cut at 48 Hz and band limit at 15.7 kHz."""
    thinned = signal.sosfilt(signal.butter(2, 48, "high", fs=SR, output="sos"), dry)
    band_limit = signal.firwin(511, 15700, window=("kaiser", 9), fs=SR)
    return signal.oaconvolve(thinned, band_limit[None], "same")


dry = scene()
out = record(dry)
store_pcm(out)
```